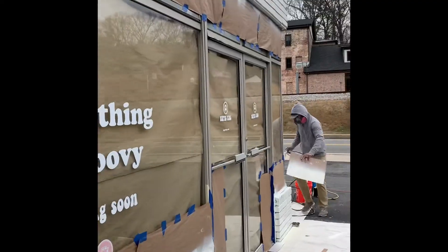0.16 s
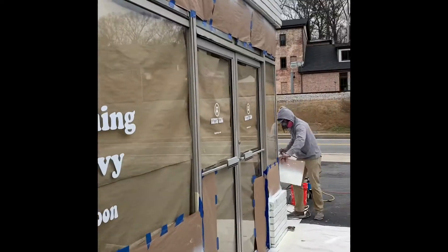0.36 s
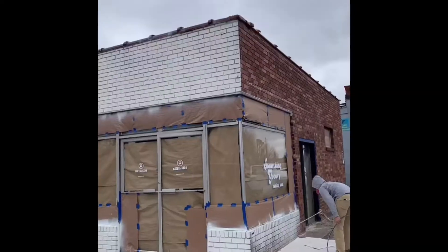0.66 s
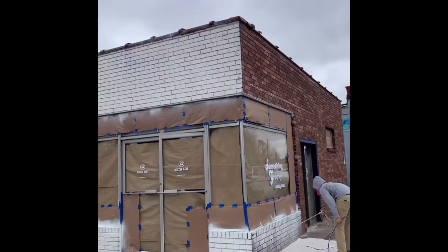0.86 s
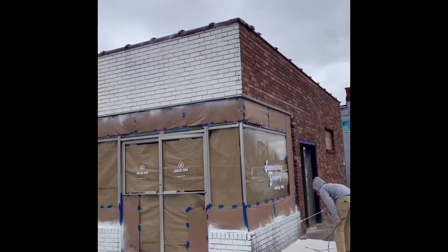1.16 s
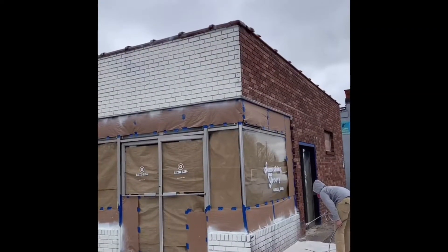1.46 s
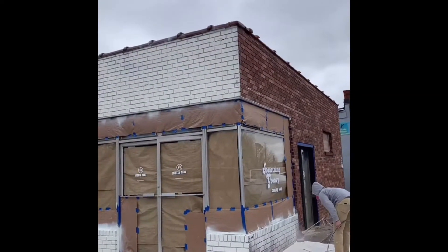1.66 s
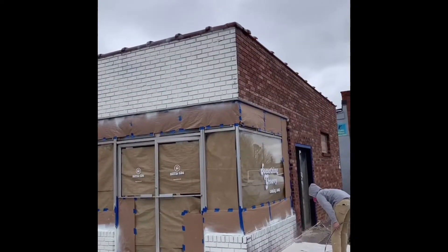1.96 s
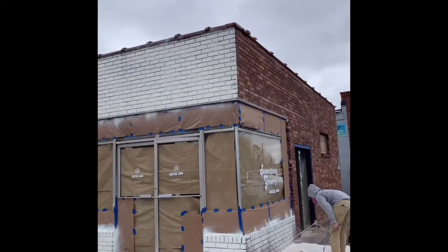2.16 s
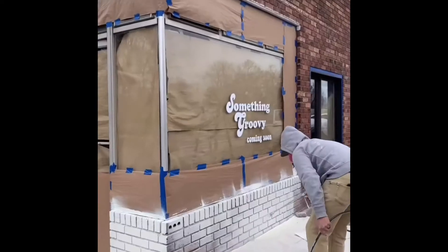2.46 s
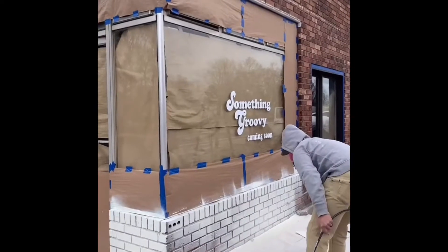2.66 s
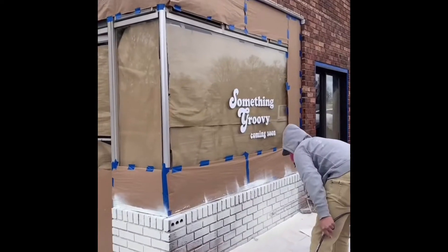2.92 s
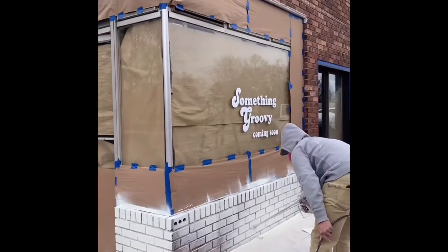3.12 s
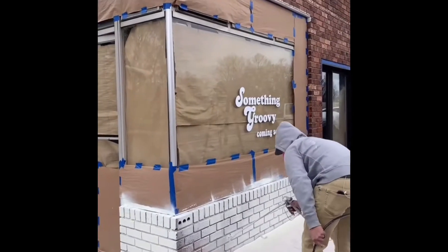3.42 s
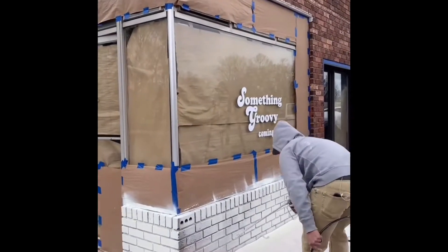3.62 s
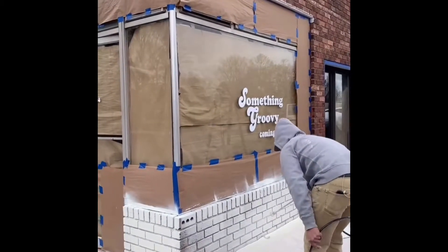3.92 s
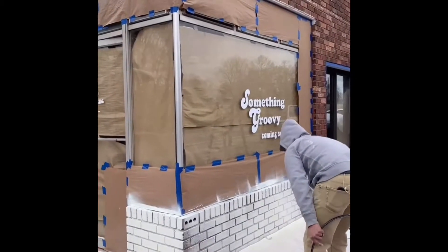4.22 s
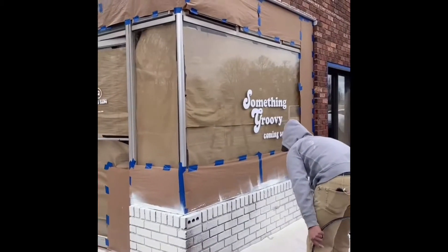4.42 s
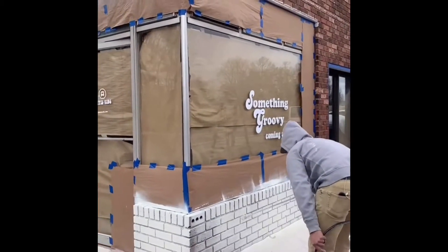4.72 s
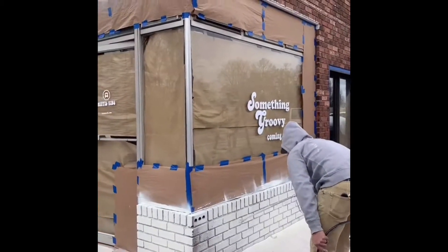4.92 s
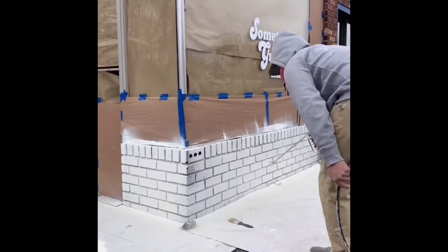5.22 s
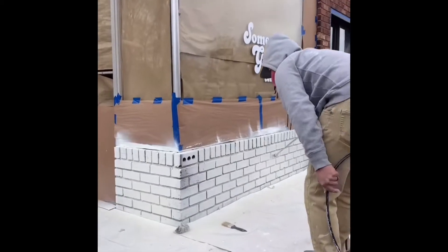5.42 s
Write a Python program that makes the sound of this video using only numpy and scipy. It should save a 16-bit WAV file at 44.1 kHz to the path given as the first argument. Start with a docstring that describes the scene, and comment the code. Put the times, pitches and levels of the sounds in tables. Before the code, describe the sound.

After a quiet half second of soft distant traffic, an electric paint sprayer cuts in abruptly. Its motor whines up and down with a fast clatter, and paint hisses onto a brick wall in separate strokes. The motor sags near the middle, then returns louder for two big revs. Wind thumps low on a close outdoor microphone; the sound is mostly mono, with a few very short dropouts.

```python
"""A paint sprayer's pump whines up and down: sines at its gear-mesh orders ring through the modes of the housing,
with a clatter of filtered noise. The spray gun hisses in strokes on brick, as coloured noise with a narrow jet band.
A thin sine tone rings on; gusty wind adds low noise and decaying puffs; far traffic is a soft wash of noise.
The sound drops out briefly four times; only the quiet first moment is wide, the rest is mono."""
import sys
import numpy as np
from scipy import signal
from scipy.io import wavfile
from scipy.ndimage import uniform_filter1d, map_coordinates

SR = 44100
rng = np.random.default_rng(int(sys.argv[2]) if len(sys.argv) > 2 else 0)


def to_wav(s):
    """Save 16-bit WAV."""
    ch = np.atleast_2d(s).T  # columns
    pcm = np.round(np.clip(ch, -1, 1) * 32767)  # PCM
    wavfile.write(sys.argv[1], SR, pcm.astype(np.int16))


N = 246078

# Street spectrum: frequency_hz, relative_density_db
STREET_SPECTRUM = [(15, -40), (25, -28.5), (76, -3), (141, -7.5), (249, -10), (451, -17), (1130, -13.5),
                   (1900, -25.5), (3920, -41.5), (4740, -56), (5430, -44.5), (16000, -67)]
# Street level: time_s, level_db
STREET_LEVEL = [(0, -41.5), (.41, -41.5), (.48, -43.5), (5.58, -35)]
# Left-right likeness of the street: frequency_hz, correlation (-1 to 1)
STREET_LIKENESS = [(60, -0.0041), (240, -0.97), (950, -0.58), (3770, -0.4), (15000, -1)]

# Wind gusts: time_s, buffeting_db
GUSTS = [(0.482, -40), (.59, -23), (.65, -35), (.8, -25.5), (.89, -31), (1.05, -34), (1.26, -23.5),
         (1.34, -32.5), (1.401, -27.5), (1.6, -33.5), (1.77, -42.5), (2.0, -33.5), (2.079, -15.5),
         (2.115, -29), (2.2, -42), (2.3, -32.5), (2.4, -55), (2.52, -21), (2.68, -37.5), (2.81, -48),
         (2.87, -24), (3.08, -35), (3.18, -29.5), (3.58, -41), (3.73, -24), (3.96, -16), (4.39, -42.5),
         (4.669, -33), (4.761, -48), (4.839, -23.5), (4.99, -35), (5.118, -12), (5.2, -23.5), (5.28, -25),
         (5.47, -41), (5.54, -27), (5.58, -59)]
# Buffeting spectrum: frequency_hz, relative_density_db
BUFFET_SPECTRUM = [(8.8, -62.5), (15, 1), (60, 8), (187, -14), (223, -24), (362, -18.5), (413, -99),
                   (500, -52), (650, -53), (1100, -120)]
# Single wind puffs: start_s, initial_level_db, pitch_hz
PUFFS = [(0.112, -23.5, 104), (2.101, -16, 58), (2.52, -29, 62.5), (3.784, -14.5, 134), (3.908, -9, 159),
         (3.93, -9, 105), (3.963, -25, 99), (4.022, -12, 97), (4.133, -17.5, 172.3), (5.075, -11.5, 107),
         (5.113, -30, 101), (5.13, -16, 120), (5.171, -18, 80.5), (5.219, -10.5, 258), (5.265, -14, 90),
         (5.523, -18, 58.6)]
RASP_DB, RASP_GROWTH = -18, 1  # rasp over buffeting in a gust of -17.5 dB; dB gained per dB of gust
RASP_FLOOR_DB = -51  # steady part of the rasp
# The deepest buffeting grows less than the rest: gain in a gust of -26.5 dB; dB gained per dB of gust
DEEP_HZ, DEEP_DB, DEEP_GROWTH = 55, 0, -0.42

# Swells of the thin tone, mostly as the gear mesh passes its pitch: peak_s, level_db
THIN_SWELLS = [(.66, -56), (.99, -47.5), (1.57, -44), (2.19, -41), (3.2, -38), (3.35, -34), (3.74, -35.5),
               (3.87, -35), (4.75, -41), (5.03, -32), (5.22, -34.5)]
THIN_HZ, THIN_RISE_S, THIN_T60_S = 1074.7, 0.017, 0.77

# Stretches of spray, one row each, a stroke being divided where a dropout interrupts it:
# start_s, end_s, splash_db, splash_swell_db (over the stretch), extra_top_db,
# jet_db, jet_swell_db (over the stretch)
SPRAY_STRETCHES = [(0.117, 0.143, -52.5, -4, 4, -52, -3), (0.477, 0.595, -36, 3, -4, -37.5, -2),
                   (0.787, 1.23, -40, -5, -3, -36.5, -7), (1.365, 1.919, -39.5, 8.5, -2, -39.5, 10),
                   (2.185, 2.467, -29.5, -2, 2.5, -48, -2), (2.713, 3.235, -26.5, 3.5, -2, -62, 0),
                   (3.402, 3.889, -26.5, -1.5, 1, -48, -17), (4.05, 4.659, -28, 7, 1, -47, 7),
                   (4.817, 4.844, -30.5, 14, 0, -53, 8), (4.922, 5.105, -24.5, 0.5, 0, -34, -11),
                   (5.294, 5.575, -25, 2.5, 1.5, -37, 9)]
# Splash spectrum: frequency_hz, relative_density_db
SPLASH_SPECTRUM = [(240, -75), (400, -63), (467, -41.5), (554, -21), (627, -20), (678, -47), (779, -19),
                   (2070, -24), (2730, -14.5), (3290, -24.5), (7380, -4), (14800, -27), (16300, -12.5)]
TOP_HZ = 10000  # the top band of the splash starts here
JET_HZ, JET_WIDTH_HZ = 11210, 1450
BURST_DB, BURST_S = 5.5, 0.0023  # each stretch starts with a spit: extra level and its decay time
OPEN_S, SHUT_T60_S = 0.0041, 0.055

# Stretches of the motor running, one list each, some divided at a dropout:
# time_s, gear_mesh_hz, clatter_db
MOTOR_STRETCHES = [
    [(.479, 1410, -32), (.58, 1941, -30), (.63, 1995, -29.5), (.71, 1915, -29.5), (.78, 1537, -32),
     (.93, 1271, -31.5), (.99, 987, -34), (1.1, 787, -39.5), (1.19, 710, -38), (1.235, 1420, -32),
     (1.27, 1507, -34), (1.34, 1348, -33), (1.45, 1361, -32), (1.56, 1057, -34), (1.65, 1070, -32),
     (1.71, 1615, -30.5), (1.885, 2211, -29.5), (2.05, 1806, -31), (2.112, 1560, -30.5)],
    [(2.186, 1195, -30), (2.238, 980, -33.5), (2.267, 900, -27), (2.33, 797.5, -34), (2.49, 628, -30.5),
     (2.54, 553, -44), (2.6, 480, -50)],
    [(2.91, 437, -30), (3.0, 1114, -27.5), (3.12, 1926, -23), (3.19, 2016, -21.5), (3.27, 2340, -22.5),
     (3.35, 2103, -22.5), (3.41, 1972, -25.5), (3.46, 1769, -23), (3.575, 1552, -25), (3.65, 1229, -27.5),
     (3.75, 1054, -26.5), (3.855, 1131, -29.5), (3.93, 801.6, -35), (4.0, 700, -37.5), (4.13, 533.8, -34.5),
     (4.205, 1257, -26), (4.39, 1983, -24), (4.47, 2080, -24.5), (4.535, 2322, -21), (4.6, 2125, -23),
     (4.77, 1946, -23.5), (4.848, 1680, -24.5)],
    [(4.924, 1370, -38.5), (5.03, 1054, -29.5), (5.1, 1150, -33), (5.15, 1400, -29), (5.19, 1230, -29),
     (5.25, 1025, -30.5), (5.4, 800, -35), (5.58, 501, -44)],
]
# Modes of the housing: frequency_hz, width_hz, gain_db
HOUSING_MODES = [(610, 300, 4), (1585, 150, 12), (2035, 350, 15), (2030, 19, -25.5), (2440, 42, 18.5),
                 (2645, 185, 18), (3233, 80, 13.5), (3350, 48, -1.5), (3670, 135, 13.5)]
# Clatter spectrum ahead of the housing: frequency_hz, relative_density_db
CLATTER_SPECTRUM = [(210, -40), (350, -21.5), (730, -3), (857, -5.5), (1070, -7), (1650, -5.5), (2030, -2),
                    (4520, -19), (5750, -9), (9140, -12.5), (16000, -36.5)]
# The piston pushes against the pressure and the loaded gears sing out:
# centre_s, whine_rise_db, half_length_s, extra_upper_orders_db
PUSHES = [(0.503, 15, 0.025, -2), (0.597, 17.5, .024, 4), (0.766, 21, 0.033, -6), (0.853, 11, .03, -3),
          (0.941, 7.5, 0.021, 4), (1.105, 8, 0.0345, 13.5), (1.169, 2, 0.028, 0), (1.279, 24, 0.037, -5.5),
          (1.485, 8.5, 0.022, 7.5), (1.735, 20, 0.024, 2), (1.888, 20.5, 0.023, -6), (2.045, 20.5, .03, -2),
          (2.206, 13, 0.027, 7.5), (2.329, 10.5, .04, 3), (2.414, -1, 0.026, 2.5), (2.495, 9, 0.017, 5),
          (2.978, 12, 0.044, -9), (3.048, 7, 0.027, 11), (3.146, 16, 0.031, -4), (3.28, 19.5, .035, -7),
          (3.426, 21.5, 0.029, -6), (3.606, 13.5, 0.036, 3.5), (3.683, 7.5, 0.0304, 8.5),
          (3.782, 1, .03, 11), (3.879, 4.5, 0.026, 13), (4.001, 8.5, 0.063, 8), (4.241, 16, 0.054, 0.5),
          (4.41, 20.5, 0.02917, -9), (4.469, 18.5, .012, -8), (4.543, 19, .022, -14), (4.604, 9, 0.014, -1),
          (4.699, 19.5, .022, -12), (4.769, 8, 0.021, -12), (4.832, 21.5, .013, -2),
          (4.95, 18.5, 0.028, -4.5), (5.065, 1, 0.0375, 4), (5.164, 17, 0.013, -6), (5.2, 4.5, 0.019, 8),
          (5.288, 9, 0.0297, 1), (5.514, 15, 0.032, -0.5)]
# Second to sixth mesh orders: level_db over the second
UPPER_ORDERS_DB = [0, -13, -9, -14, -16]
# Whine ahead of the housing, over the clatter level, between pushes at 1700 Hz; its change with speed
WHINE_DB, WHINE_DB_PER_OCTAVE = -25, -3
# Second order over the first at 1700 Hz, between pushes; its change with speed
SECOND_DB, SECOND_DB_PER_OCTAVE = -9.5, -2
# The whine weakens while the speed shoots up: change at this rate of rise
SPURT_DB, SPURT_OCTAVES_PER_S = -5.5, 7.9

# Dropouts: start_s, end_s, first_drop_db
GAPS = [(0.414, 0.477, -25), (2.11, 2.185, -19.5), (2.239, 2.267, -29), (4.844, 4.924, -23)]
WIDE_UNTIL_S, EDGE_HZ = .44, 15850  # end of the wide sound; upper band limit


def gain_of(db):
    """Decibel law: amplitude ratio of a level."""
    return 10 ** (np.asarray(db) / 20)


def evened(x):
    """Power normalisation: scales to rms 1."""
    return x / np.sqrt(np.mean(x ** 2) + 1e-20)


def read(points, hz):
    """Logarithmic frequency scale: interpolates a curve on it."""
    f, value = np.transpose(points)
    return np.interp(np.log(hz + 1), np.log(f + 1), value)


def along(rows):
    """Linear interpolation in time: columns of a curve table at every sample."""
    s, *columns = np.transpose(rows)
    return [np.interp(np.arange(N) / SR, s, c) for c in columns]


def held(start, end, rise, t60):
    """Exponential decay: a gain that opens at start, holds, and dies away after end."""
    t = np.arange(N) / SR
    opening = np.clip((t - start) / rise, 0, 1)
    return opening * gain_of(-60 * np.maximum(t - end, 0) / t60)


def drift(hz):
    """Low-pass filtered noise: chance fluctuation up to hz, rms 1."""
    lowpass = signal.butter(2, hz, fs=SR, output="sos")
    return evened(signal.sosfilt(lowpass, rng.standard_normal(N)))


def resonate(x, hz, width):
    """Heterodyning: shifts hz down to zero, smooths and shifts back, a resonance of gain 1."""
    turn = np.exp(2j * np.pi * np.cumsum(hz * np.ones(len(x))) / SR)
    r = np.exp(-np.pi * width / SR)
    smoothed = signal.lfilter([1 - r], [1, -r], x / turn + 1e-18)
    return 2 * (turn * smoothed).real


def noise(spectrum, patchy_db, size=512, same=None):
    """Short-time Fourier synthesis: random spectra with drifting patches; a likeness table gives a pair."""
    hz = np.fft.rfftfreq(size, 1 / SR)
    a, b, c, d, patches = rng.standard_normal((4 * N // size + 5, len(hz), 5)).T
    patches = uniform_filter1d(patches, size=6, axis=0)
    patches = evened(uniform_filter1d(patches, size=12, axis=1))
    z = a + 1j * b
    if same:
        alike = np.clip(read(same, hz), -1, 1)[:, None]
        other = alike * z + np.sqrt(1 - alike ** 2) * (c + 1j * d)
        z = np.array([z, other])
    z = z * gain_of(read(spectrum, hz)[:, None] + patchy_db * patches)
    return evened(signal.istft(z, nperseg=size, noverlap=3 * size // 4)[1][..., :N])


def street():
    """Diffuse field: a wash of far traffic, partly unlike at left and right."""
    level_db, = along(STREET_LEVEL)
    return gain_of(level_db) * noise(STREET_SPECTRUM, 0.17, size=1024, same=STREET_LIKENESS)


def wind():
    """Turbulent pressure on the microphone: lumpy buffeting, a rasp on the gust tops, and single puffs."""
    buffet_db, = along(GUSTS)
    rasp_db = buffet_db + RASP_DB + RASP_GROWTH * (buffet_db + 17.5)
    rasp_gain = gain_of(rasp_db) + gain_of(RASP_FLOOR_DB)
    lumps = gain_of(3.2 * drift(25))
    rasp = resonate(resonate(rng.standard_normal(N), 209, 170), 209, 170)
    rasp = evened(rasp) * gain_of(1.4 * drift(30))

    buffet = noise(BUFFET_SPECTRUM, 1.0, size=1024)
    deep = signal.sosfiltfilt(signal.butter(2, DEEP_HZ, fs=SR, output="sos"), buffet)
    deep_gain = gain_of(DEEP_DB + DEEP_GROWTH * (buffet_db + 26.5))
    buffet = buffet + (deep_gain - 1) * deep

    blowing = held(GUSTS[0][0], GUSTS[-1][0], 0.0011, .1)
    out = blowing * lumps * (gain_of(buffet_db) * buffet + rasp_gain * rasp)
    t = np.arange(N) / SR
    for start, level_db, hz in PUFFS:
        cycles = np.maximum(t - start, 0) * hz
        out += gain_of(level_db) * np.sin(2 * np.pi * cycles) * np.exp(-cycles / 1.17)
    return out


def walls(x, db, t60):
    """Scattered reflection: one echo of random sign in every 40 samples off the buildings, dying away."""
    at = np.arange(300, SR // 4, 40)
    sign = rng.choice([-1., 1.], len(at))
    taps = np.zeros(SR // 2)
    taps[at + rng.integers(0, 40, len(at))] = sign * gain_of(-60 * at / SR / t60)
    taps = taps / np.linalg.norm(taps)
    return x + gain_of(db) * signal.oaconvolve(x, taps)[:N]


def thin_tone():
    """Lightly damped resonance: a narrow sine of the frame rings on, wavering in pitch and level."""
    swells = [gain_of(db) * held(s - THIN_RISE_S, s, THIN_RISE_S, THIN_T60_S) for s, db in THIN_SWELLS]
    ring = np.max(swells, axis=0)
    flicker = gain_of(2.5 * drift(12))
    phase = 2 * np.pi * np.cumsum(THIN_HZ + 5.2 * drift(8.9)) / SR
    return np.sqrt(2) * ring * flicker * np.sin(phase)


def spray():
    """Turbulent jet noise: paint bursts on the brick in a wide hiss; the jet sings in one high band."""
    splash = noise(SPLASH_SPECTRUM, 2.16, size=256) * gain_of(.5 * drift(300))
    top = signal.sosfiltfilt(signal.butter(2, TOP_HZ, "high", fs=SR, output="sos"), splash)
    hz = JET_HZ * (1 + .025 * drift(3))
    jet = resonate(resonate(rng.standard_normal(N), hz, JET_WIDTH_HZ), hz, JET_WIDTH_HZ)
    jet = evened(jet) * gain_of(1.9 * drift(23))

    out = np.zeros(N)
    t = np.arange(N) / SR
    for start, end, splash_db, swell_db, top_db, jet_db, jet_swell_db in SPRAY_STRETCHES:
        sweep = np.clip((t - start) / (end - start), 0, 1) - .5
        burst_db = BURST_DB * np.exp(-np.maximum(t - start, 0) / BURST_S)
        coloured = splash + (gain_of(top_db) - 1) * top
        hiss = gain_of(splash_db + swell_db * sweep + burst_db) * coloured
        singing = gain_of(jet_db + jet_swell_db * sweep) * jet
        out += held(start, end, OPEN_S, SHUT_T60_S) * (hiss + singing)

    # an echo off the pavement, its path drifting as the gun sweeps, slides the colour about
    late = SR * (.0016 + .0004 * drift(1.2))
    return out + .35 * map_coordinates(out, [np.arange(N) - late], order=3)


def housing(x, direct_db):
    """Modal resonance: the case of the pump rings at its modes over a flat path."""
    modes = sum(gain_of(db) * resonate(x, hz, width) for hz, width, db in HOUSING_MODES)
    return gain_of(direct_db) * x + modes


def motor():
    """Gear-mesh excitation: harmonic orders swell on each push; clatter brightens with speed."""
    rattle = noise(CLATTER_SPECTRUM, 2.2) * gain_of(1.2 * drift(90))
    rattle = evened(housing(rattle, 4.06))
    treble = signal.sosfilt(signal.butter(4, 4300, "high", fs=SR, output="sos"), rattle)
    wobble = drift(120)
    uneven = gain_of(1.8 * drift(70))  # the whine's level wavers quickly by chance
    grit = rng.standard_normal(N)

    t = np.arange(N) / SR
    _, rise_db, _, extra_upper_db = np.transpose(PUSHES)
    places = [(t - s) / half for s, _, half, _ in PUSHES]
    bumps = np.array([np.exp(-.5 * place ** 2) for place in places])
    load_db = rise_db @ bumps
    upper_db = extra_upper_db @ bumps
    # the load drags the speed from above to below its mean through each push
    sag = 0.02875 * sum(place * bump for place, bump in zip(places, bumps))
    flicker_db = [3.5 * drift(25) + 3.0 * drift(150) for _ in UPPER_ORDERS_DB]
    patchy = gain_of(3.0 * drift(20))

    whine, clatter = np.zeros(N), np.zeros(N)
    for rows in MOTOR_STRETCHES:
        hz, clatter_db = along(rows)
        octaves = np.log2(hz / 1700)
        climb = uniform_filter1d(np.gradient(octaves) * SR, size=400)  # octaves per second
        spurt = np.clip(climb / SPURT_OCTAVES_PER_S, 0, 2)
        whine_db = clatter_db + WHINE_DB + WHINE_DB_PER_OCTAVE * octaves + SPURT_DB * spurt
        second_db = SECOND_DB + SECOND_DB_PER_OCTAVE * octaves + upper_db

        phase = 2 * np.pi * np.cumsum(hz * (1 + 0.00734 * wobble - sag)) / SR
        fuzz = evened(resonate(resonate(grit, hz, 100), hz, 100))  # worn teeth blur the line
        orders = enumerate(zip(UPPER_ORDERS_DB, flicker_db), 2)
        upper = sum(gain_of(db + flicker) * np.sin(k * phase) for k, (db, flicker) in orders)
        mesh = np.sin(phase) + gain_of(-4) * fuzz
        mesh = mesh + gain_of(second_db) * upper

        running = held(rows[0][0], rows[-1][0], 0.00049, 0.38)
        whine += running * gain_of(whine_db + load_db) * uneven * patchy * mesh
        brighter = gain_of(0.56 * octaves) - 1
        clatter += running * gain_of(clatter_db + 0.019 * load_db) * (rattle + brighter * treble)
    return housing(whine, 2.94) + clatter


def scene():
    """Superposition: sums the sources, the gun's echoes opposite in sign at left and right."""
    pump = walls(motor(), -9, .14)
    gun = spray()
    echoes = walls(gun, 4.1, 0.056) - gun
    return pump + thin_tone() + gun + np.array([echoes, -echoes]) + wind() + street()


def record(dry):
    """Channel summation and band limiting: mono after the first moment, with dropouts that fade fast."""
    t = np.arange(N) / SR
    out = np.where(t < WIDE_UNTIL_S, dry, dry.mean(0))
    # the microphone sheds deep bass
    out = signal.sosfilt(signal.butter(2, 32, "high", fs=SR, output="sos"), out)
    for start, end, first_drop_db in GAPS:
        trail = gain_of(first_drop_db - 1000 * (t - start))  # falls on at 1000 dB per second
        out = out * np.where((t > start) & (t < end), trail, 1)
    lowpass = signal.firwin(1023, EDGE_HZ, window=("kaiser", 9), fs=SR)
    return signal.oaconvolve(out, lowpass[None], "same")


dry = scene()
out = record(dry)
to_wav(out)
```